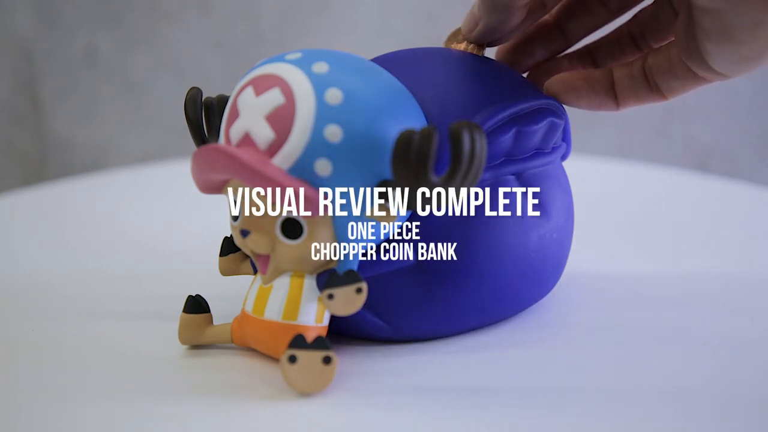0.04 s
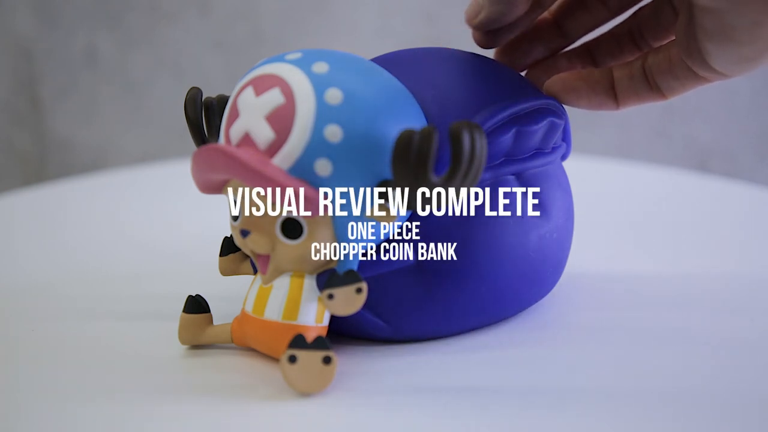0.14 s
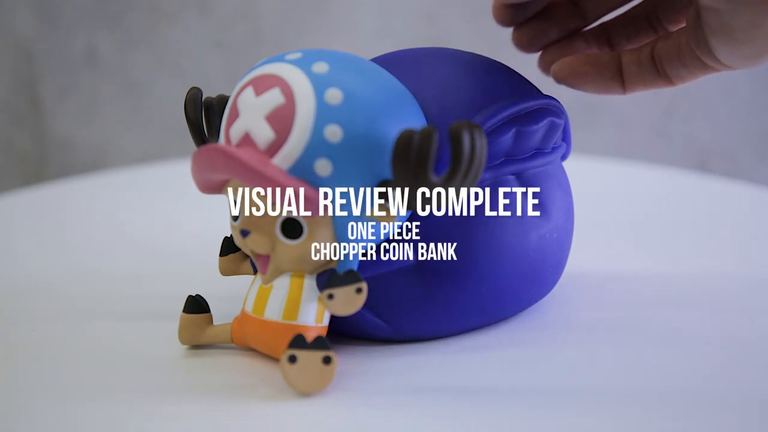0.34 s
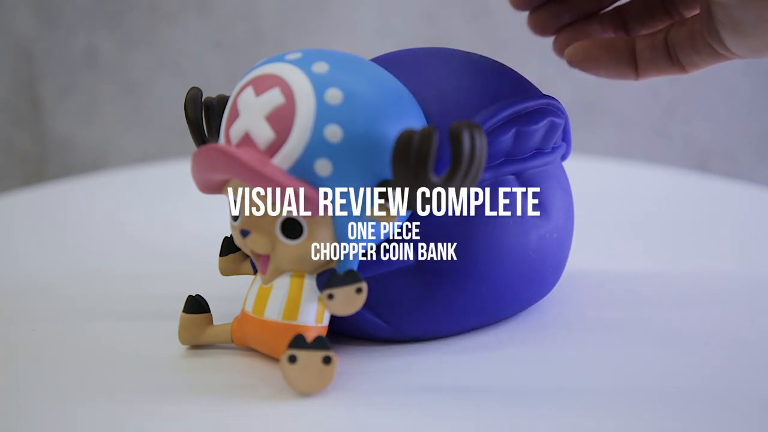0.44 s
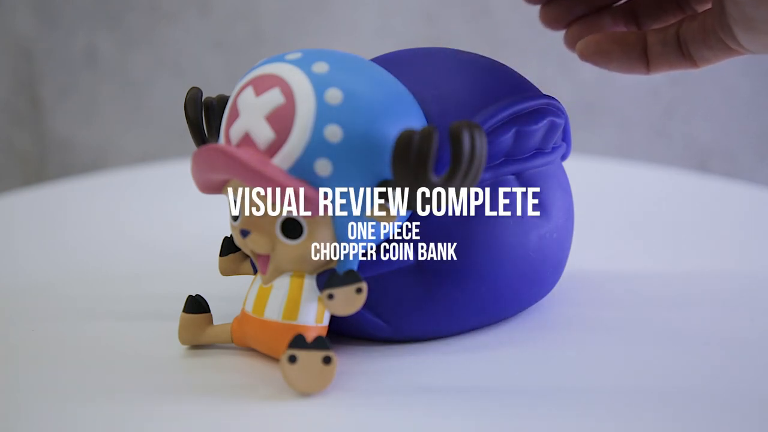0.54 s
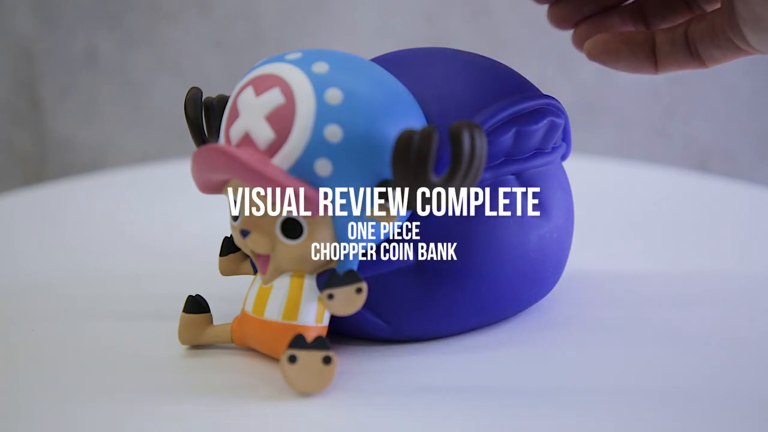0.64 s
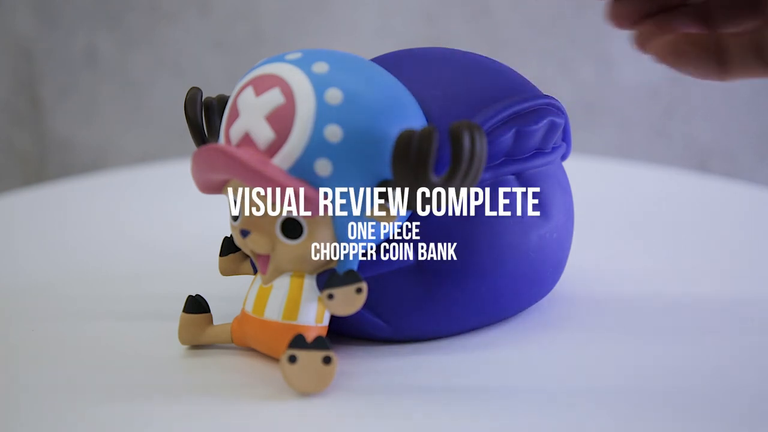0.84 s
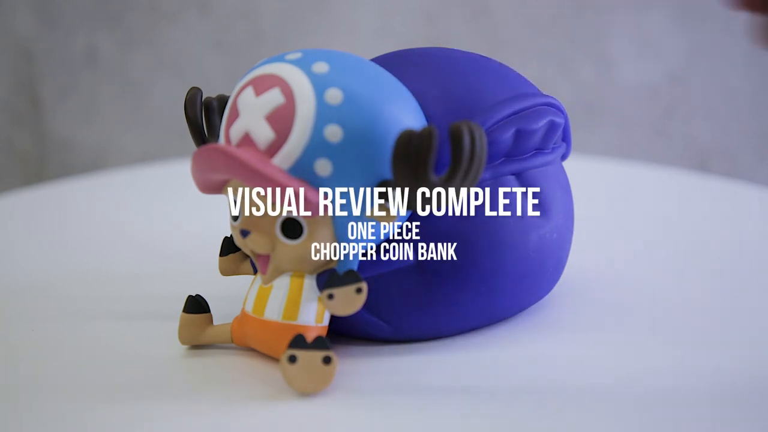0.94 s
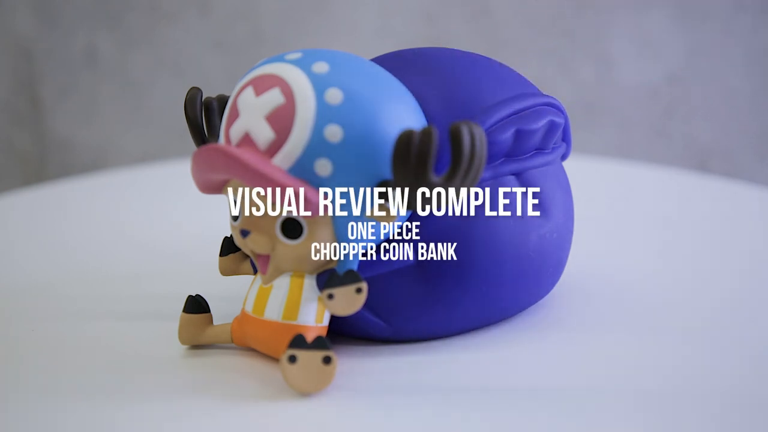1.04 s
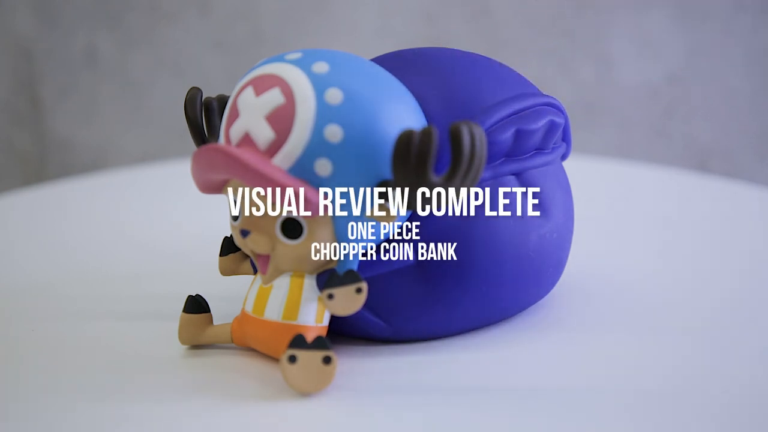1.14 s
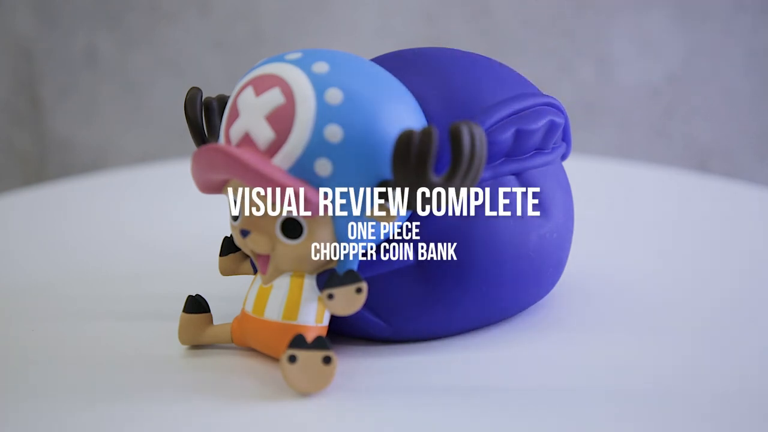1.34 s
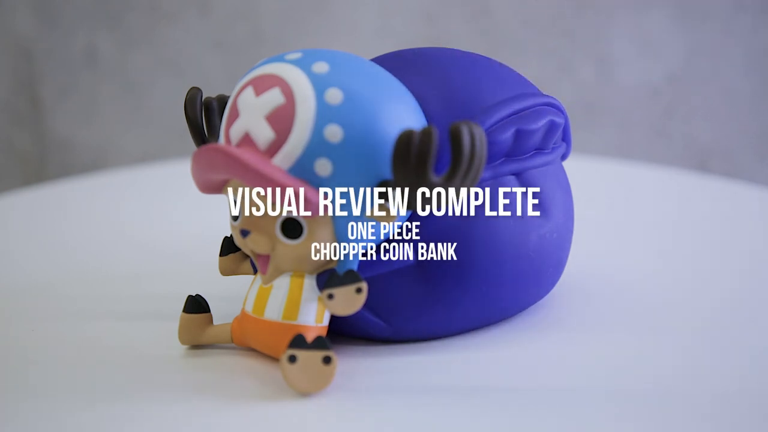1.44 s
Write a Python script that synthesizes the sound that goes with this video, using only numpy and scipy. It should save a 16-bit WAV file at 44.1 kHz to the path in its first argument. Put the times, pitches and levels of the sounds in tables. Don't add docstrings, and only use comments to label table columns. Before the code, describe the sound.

A coin ticks lightly on the slot of a hollow plastic toy bank, drops in with three hard clacks and a table thud, then rattles quickly to rest; close microphone, small room, faint hum and hiss.

```python
import sys
import numpy as np
from scipy import signal
from scipy.fft import rfft, irfft
from scipy.io import wavfile
from scipy.ndimage import uniform_filter1d

SR = 44100
rng = np.random.default_rng(int(sys.argv[2]) if len(sys.argv) > 2 else 0)


def voltage_ratio(level):
    return 10 ** (np.asarray(level, float) / 20)


def generate_wav(signal):
    frames = np.transpose(np.atleast_2d(signal))
    scaled = np.clip(frames, -1, 1) * 32767
    pcm = np.round(scaled).astype(np.int16)
    wavfile.write(sys.argv[1], SR, pcm)


N = 66150

# (frequency [Hz], level [dB rms])
HUM_TONES = [(59.6, -67), (120, -61.5), (239.9, -48), (360.2, -58.5), (478.7, -96), (600, -63.5),
             (631.2, -63), (670.9, -63), (710.3, -60.5), (924.3, -68), (1128.8, -67.5), (1320, -67.5),
             (2912, -70), (3030.5, -64)]
# (frequency [Hz], density [dB per Hz])
AIR_SPECTRUM = [(20, -11.5), (90, -17), (180, -10), (330, -9.5), (800, -16.5), (2000, -23), (7000, -30),
                (16000, -34.5)]
# (time [s], level [dB])
BACKGROUND_FADER = [
    (0, 3.5),
    (.3, 7),
    (.6, 3.5),
    (0.749, 0.5),
    (1.1, -1),
    (1.5, -2),
]
# (frequency [Hz], level [dB], t60 [s])
TABLE_MODES = [(142, 0, 0.3), (160, -21, .06)]
# (time [s], peak level [dB])
TABLE_THUDS = [
    (0.237, -54),
    (.2745, -17.5),
    (0.34, -49.5),
    (0.367, -52),
]
# (frequency [Hz], level [dB], t60 [s])
SLOT_MODES = [(1030, 0, 0.013), (1556, 1, .006), (2230, 4, 0.0056), (3030, 3, 0.0086), (4180, 0, 0.0041)]
# (time [s], peak level [dB], spectral tilt [dB per octave])
SLOT_TAPS = [
    (0.1155, -29, -4),
    (0.1227, -38, 1),
    (.1750, -31, 4),
    (0.1788, -34, 10),
]
# (frequency [Hz], level [dB], t60 [s])
SHELL_MODES = [(722.1, -4.5, 0.029), (1070, -0.5, 0.018), (1391, -8.5, 0.022), (1721, -10.5, 0.043),
               (1770, -3, 0.032), (1871, 4, 0.033), (2047, -7.5, 0.042), (2374, -9, 0.075),
               (2720, -9, 0.032), (3537, -7.5, 0.023), (911, -19, 0.033)]
# (frequency [Hz], level [dB], t60 [s])
EDGE_MODES = [(2680, -2, 0.018), (3310, 2, 0.01), (4420, 6.5, 0.0052), (5120, -0.5, 0.0094),
              (5190, -5, 0.023), (6800, -36.5, 0.015), (7900, 2, 0.0094), (8700, -24, .006),
              (10900, -6, 0.0068), (13700, -32, 0.0055), (13390, -18, 0.0053)]
# (frequency [Hz], level [dB], t60 [s])
COIN_MODES = [(8005, -18, 0.091), (8274, -26, 0.098), (9410, -16, 0.058), (10750, -21, 0.22),
              (13350, -6, 0.043), (13230, -1.5, 0.065), (13460, -7, .04)]
# (frequency [Hz], level [dB], t60 [s])
BELLY_MODES = [(243.9, -0.5, 0.066), (266, -2.5, .04), (319, -11.5, 0.043), (438, -7.5, 0.027)]
# (time [s], shell clack peak [dB], edge click peak [dB],
# coin ring peak [dB], hollow boom peak [dB])
COIN_HITS = [(0.2379, -11, -8, -53.5, -23.5), (.2514, -10, -11, -20, -12.5), (0.253, -8.5, -17, -46.5, -15),
             (0.2729, -13, -26, -37, -28.5), (.2740, -4.5, -13.5, -40, -20.5),
             (0.2804, -39, -14.5, -25, -48), (.2910, -26, -32, -51, -31), (0.295, -23, -27, -48.5, -32.5),
             (.3170, -27, -22.5, -46, -48), (0.331, -46, -38, -27, -29.5), (0.336, -13, -27, -21, -24),
             (.3420, -11.5, -20.5, -23, -25.5), (.3490, -19.5, -24.5, -28, -32),
             (.3570, -18.5, -31, -44, -33.5), (0.3651, -28, -18, -26, -35.5),
             (.3740, -20.5, -39, -24.5, -30), (0.388, -29, -35, -41, -34), (0.414, -50, -42, -61, -42)]


def fall(t, t60):
    return np.exp(-np.log(1000) * t / t60)


def unit(x):
    return x / np.sqrt(np.mean(x ** 2))


def walk(rate):
    k = int(SR / rate)
    steps = np.repeat(rng.standard_normal(N // k + 1), k)
    smooth = uniform_filter1d(uniform_filter1d(steps, k), k)
    return unit(smooth[:N])


def push(width_s):
    t = np.arange(2048) / SR
    return t * np.exp(-2 * t / width_s)


def ring(modes, detune, force, db):
    scatter_db = 3.5
    t = np.arange(SR // 3) / SR
    hz, mode_db, t60 = np.array(modes).T[:, :, None]
    level_chance, pitch_chance = rng.standard_normal((2, len(modes), 1))
    sign = (-1) ** np.floor(2 * np.log2(hz))
    level = sign * voltage_ratio(mode_db + scatter_db * level_chance)
    tone = np.sin(2 * np.pi * hz * (1 + detune * pitch_chance) * t)
    free = (level * fall(t, t60) * tone).sum(0)
    sound = signal.fftconvolve(free, force)
    return voltage_ratio(db) * sound / abs(sound).max()


def place_at(out, time_s, sound):
    start = int(time_s * SR)
    out[start:start + len(sound)] += sound


def appliance_hum():
    wobble_db, wobble_hz = -0.3, 11.5
    t = np.arange(N) / SR
    out = np.zeros(N)
    for hz, db in HUM_TONES:
        level = np.sqrt(2) * voltage_ratio(db + wobble_db * walk(wobble_hz))
        out += level * np.sin(2 * np.pi * (hz * t + rng.random()))
    return out


def room_air():
    air_db, flicker_db, flicker_hz = -48, 0, 10
    f = np.maximum(np.arange(N // 2 + 1) * SR / N, 1)
    hz, db = np.array(AIR_SPECTRUM).T
    noise = rfft(rng.standard_normal(N)) * voltage_ratio(np.interp(np.log(f), np.log(hz), db))
    octave = np.log2(f / 30)
    out = np.zeros(N)
    for k in range(11):
        band = noise * np.clip(1 - abs(octave - k), 0, 1)
        out += irfft(band, N) * voltage_ratio(flicker_db * walk(flicker_hz))
    return voltage_ratio(air_db) * unit(out)


def room(x):
    level_db, gap_s, split_hz = -10, 0.005, 5300
    t60_low_s, t60_high_s = 0.38, 0.15
    t = np.arange(SR * 2 // 3) / SR
    noise = rng.standard_normal(len(t))
    low = signal.sosfilt(signal.butter(1, split_hz, fs=SR, output="sos"), noise)
    tail = low * fall(t, t60_low_s) + (noise - low) * fall(t, t60_high_s)
    tail *= 1 - np.exp(-(t / gap_s) ** 2)
    tail /= np.sqrt(np.sum(tail ** 2))
    return x + voltage_ratio(level_db) * signal.fftconvolve(x, tail)[:N]


def table_thuds():
    out = np.zeros(N + SR)
    for time_s, db in TABLE_THUDS:
        place_at(out, time_s, ring(TABLE_MODES, 0.0061, push(0.004), db))
    return out[:N]


def slot_taps():
    out = np.zeros(N + SR)
    for time_s, db, tilt_db in SLOT_TAPS:
        rim = [(hz, mode_db + tilt_db * np.log2(hz / 2000), t60) for hz, mode_db, t60 in SLOT_MODES]
        place_at(out, time_s, ring(rim, 0.037, np.ones(1), db))
    return out[:N]


def coin_hits():
    contact_s, chatter, boom_s = 0.0012, 0.1, 0.00062
    grit_db, grit_t60_s = -6.5, 0.044
    out = np.zeros(N + SR)
    t = np.arange(2048) / SR
    for time_s, shell_db, click_db, ring_db, boom_db in COIN_HITS:
        touch = chatter * rng.standard_normal(len(t)) * np.exp(-t / contact_s)
        touch[0] = 1
        sound = ring(SHELL_MODES, 0.019, touch, shell_db)
        sound += ring(EDGE_MODES, 0.035, touch, click_db)
        sound += ring(COIN_MODES, 0.00116, touch, ring_db)
        sound += ring(BELLY_MODES, 0.0088, push(boom_s), boom_db)
        grit = rng.standard_normal(len(t)) * fall(t, grit_t60_s)
        sound[:len(t)] += voltage_ratio(click_db + grit_db) * grit
        place_at(out, time_s, sound)
    return out[:N]


def scene():
    time_s, db = np.array(BACKGROUND_FADER).T
    fader = voltage_ratio(np.interp(np.arange(N) / SR, time_s, db))
    background = fader * (appliance_hum() + room_air())
    near = room(table_thuds() + slot_taps() + coin_hits())
    band = signal.butter(3, [118.8, 13430], "band", fs=SR, output="sos")
    return (background + signal.sosfilt(band, near))[None]


def roll_off(x):
    return signal.sosfilt(signal.butter(12, 16820, fs=SR, output="sos"), x)


def record(dry):
    top_cut = signal.ellip(6, 0.2, 30, 15800, fs=SR, output="sos")
    mix = signal.sosfilt(top_cut, dry)
    return roll_off(mix)


dry = scene()
out = record(dry)
generate_wav(out)
```